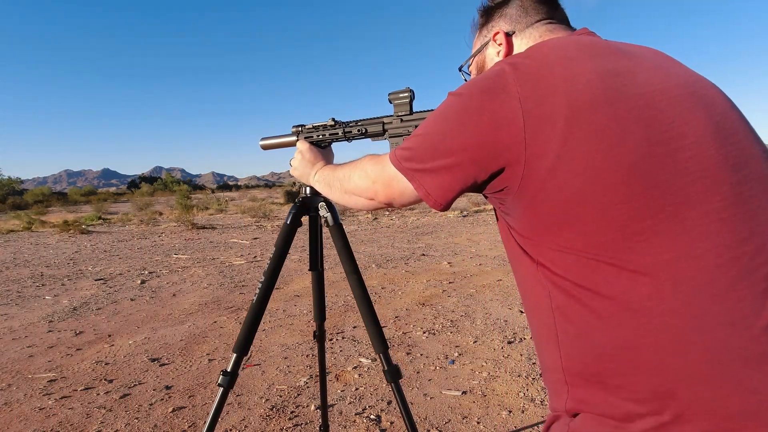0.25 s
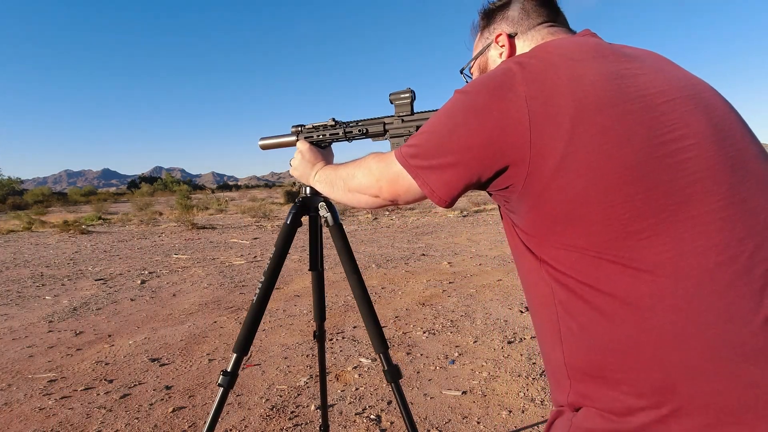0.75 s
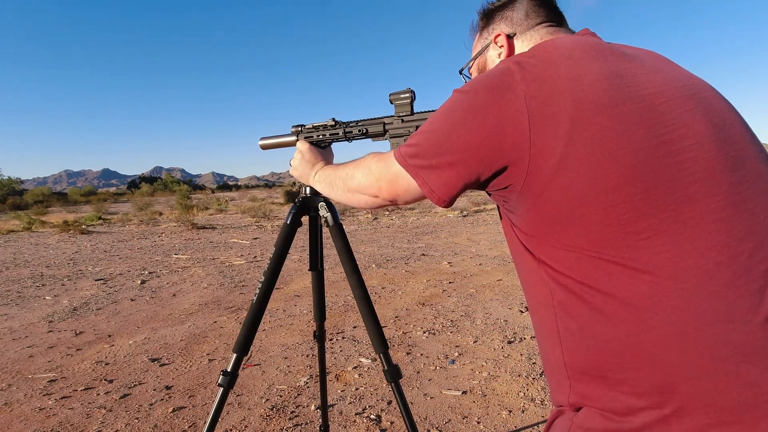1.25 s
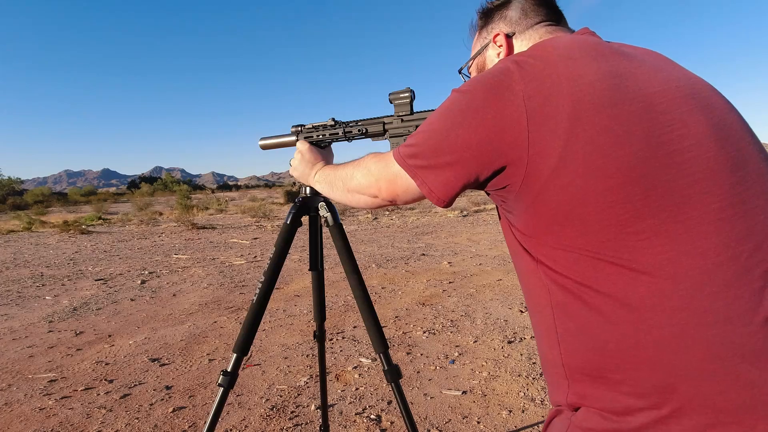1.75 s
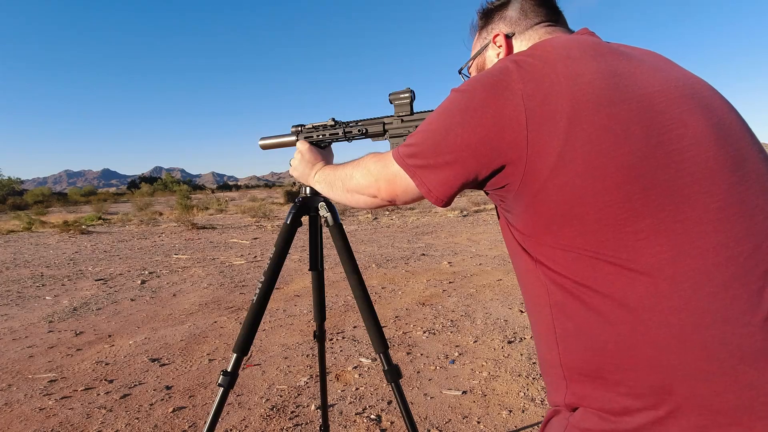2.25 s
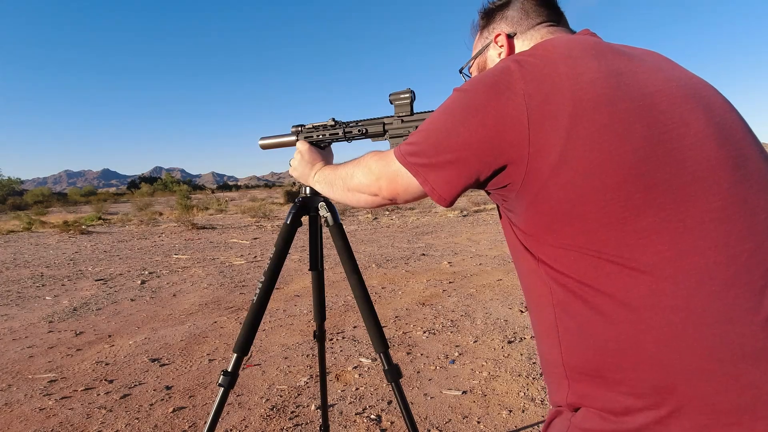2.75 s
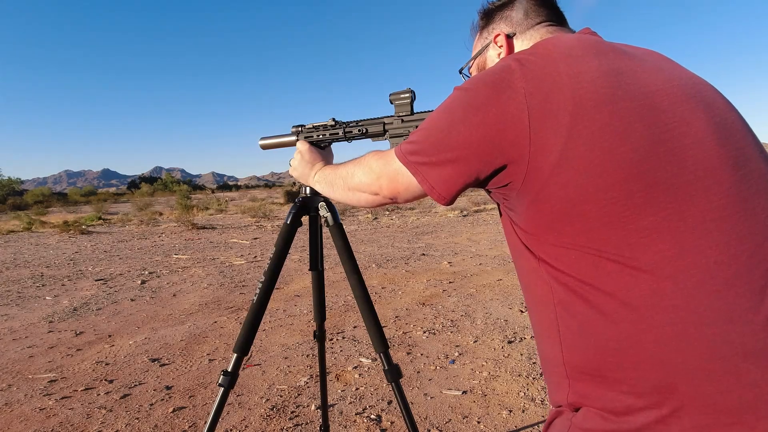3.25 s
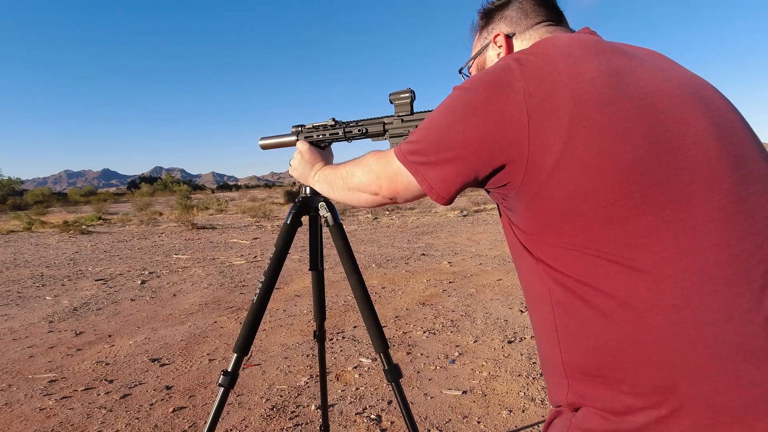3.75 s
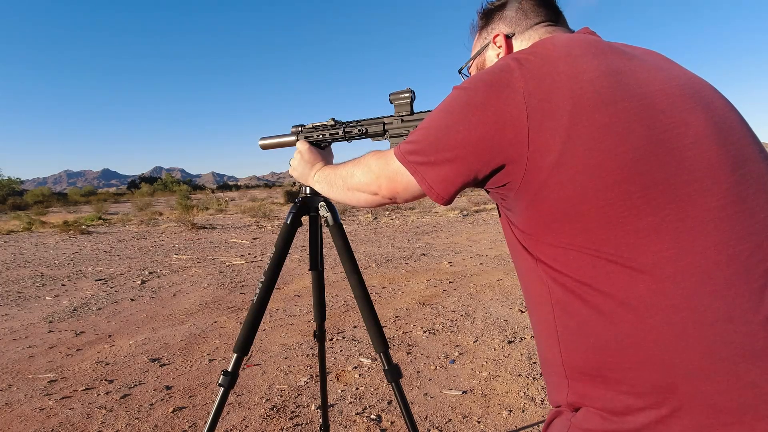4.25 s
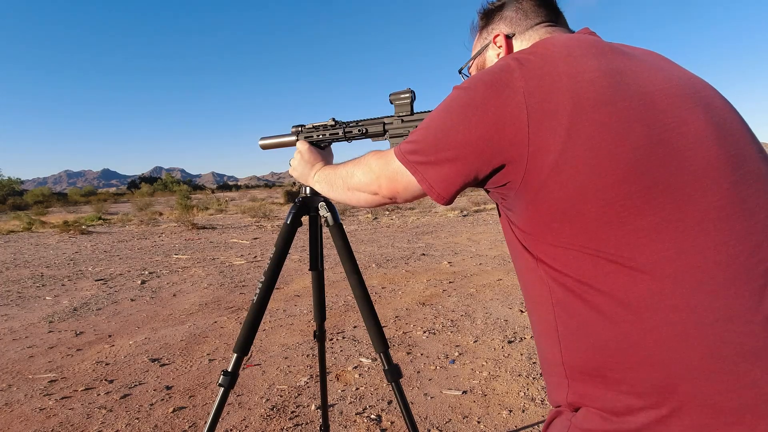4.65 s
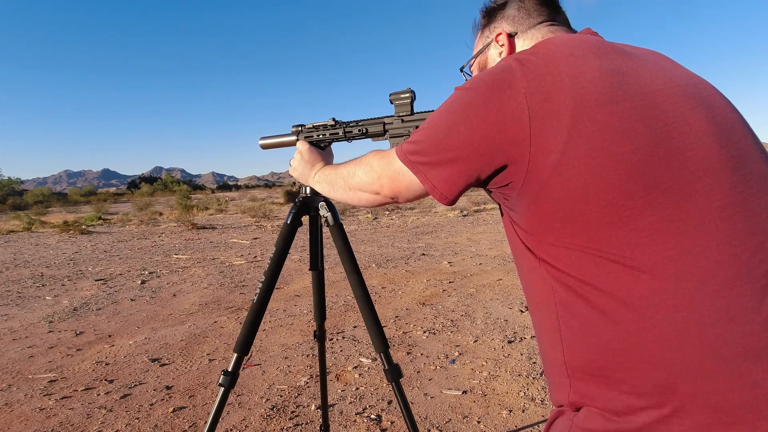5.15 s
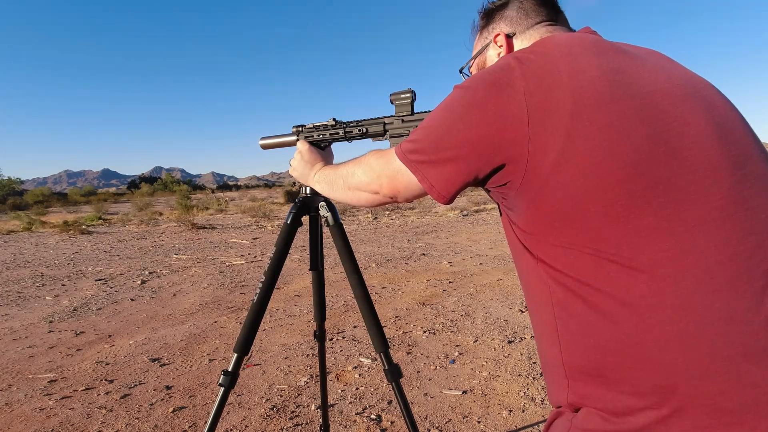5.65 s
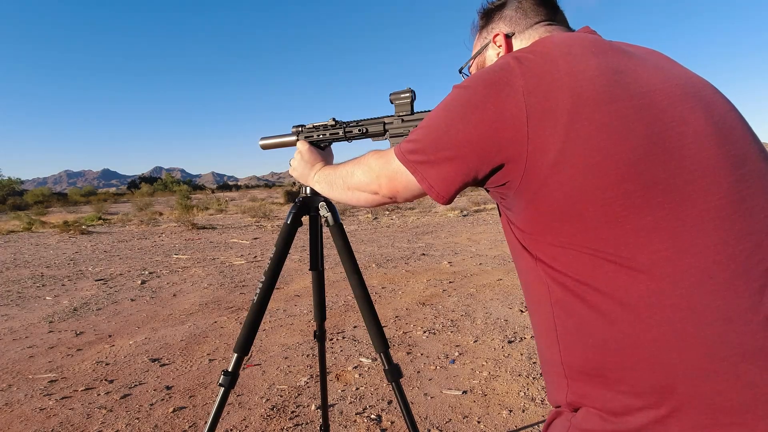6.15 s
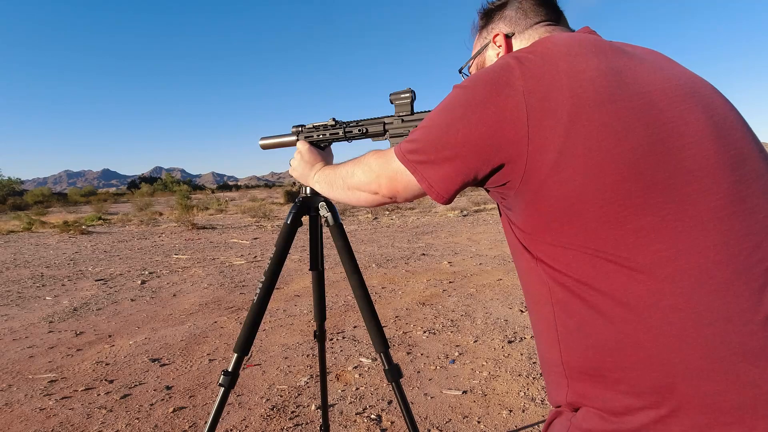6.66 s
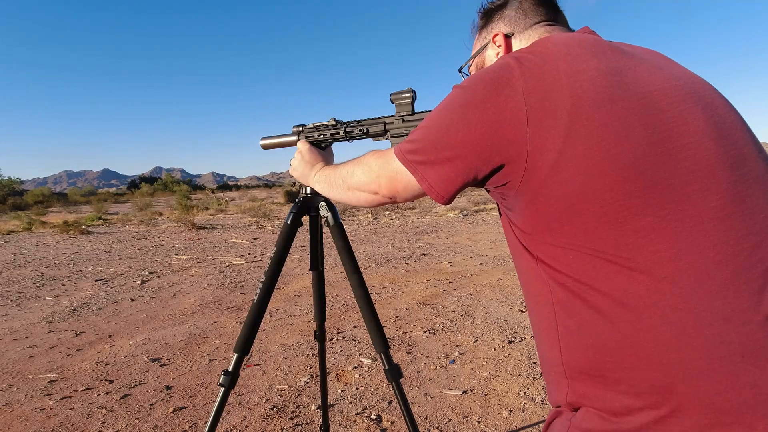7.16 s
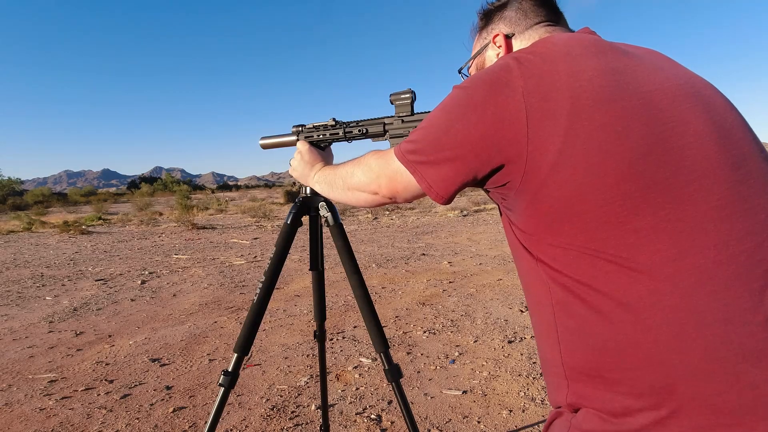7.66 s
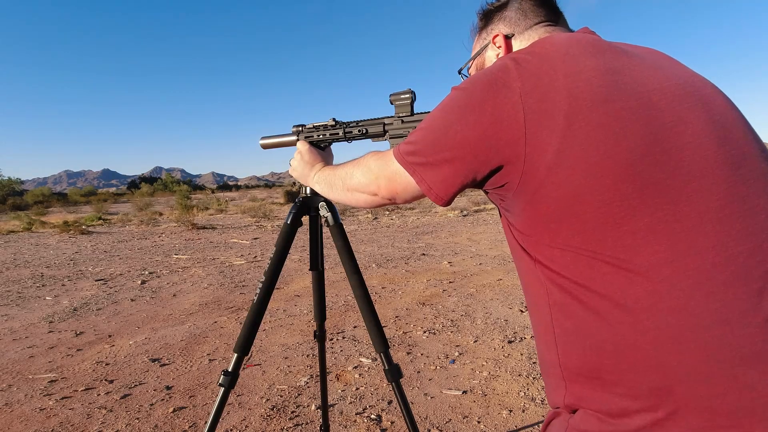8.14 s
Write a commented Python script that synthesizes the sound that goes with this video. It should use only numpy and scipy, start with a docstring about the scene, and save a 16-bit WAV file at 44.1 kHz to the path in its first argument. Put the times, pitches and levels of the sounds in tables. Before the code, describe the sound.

Three close suppressed rifle shots overload a small microphone, each followed by crackling scrub echoes and a dulling desert rumble, after a selector click.

```python
"""Suppressed rifle in open desert

A suppressed rifle fires three times beside a small microphone; each blast is a noise pulse that clips.
Scrub and slopes send back scattered noise, largely alike each time: it dulls with delay, and the
interference of a ground bounce cuts a sliding notch in it. Far off another gun thuds as a damped sine;
metal parts tick as noise bursts and resonant modes, and light wind pushes slowly on the microphone.
"""
import sys
import numpy as np
from scipy import signal
from scipy.io import wavfile
from scipy.ndimage import uniform_filter1d

SR = 44100
rng = np.random.default_rng(int(sys.argv[2]) if len(sys.argv) > 2 else 0)


def master(y):
    """Save y as 16-bit WAV."""
    cut = np.clip(np.atleast_2d(y).T, -1, 1)
    pcm = np.round(cut * 32767)  # scale
    wavfile.write(sys.argv[1], SR, pcm.astype(np.int16))


def rack_gain(trim_db):
    """Turn a fader trim in dB into the linear factor to multiply a signal by."""
    fader = np.asarray(trim_db, float)
    return 10 ** (fader / 20)


N = 370351


def evened(x):
    """Normalisation: scales a signal to rms 1."""
    return x / np.sqrt(np.mean(x ** 2) + 1e-20)


def read(points, hz):
    """Spectral interpolation: reads a table on a logarithmic frequency axis."""
    f, value = np.transpose(points)
    return np.interp(np.log(hz + 1), np.log(f + 1), value)


def add(mix, s, sound):
    """Superposition: sums a sound into the pressure from s seconds on."""
    part = mix[round(s * SR):][:len(sound)]
    part += sound[:len(part)]


def clock(s):
    """Sampling: the sample times within s seconds."""
    return np.arange(round(s * SR)) / SR


def shaped(x, gain, size=512):
    """Time-varying filtering: weights the short-time spectrum by gain(hz, t)."""
    lap = size * 3 // 4
    hz, t, z = signal.stft(x, SR, nperseg=size, noverlap=lap)
    z = z * gain(hz[:, None], t)
    return signal.istft(z, SR, nperseg=size, noverlap=lap)[1][:len(x)]


def noise(s, spectrum, size=512):
    """Stationary random process: noise of a given spectrum, rms 1."""
    white = rng.standard_normal(round(s * SR))
    return evened(shaped(white, lambda hz, t: rack_gain(read(spectrum, hz)), size=size))


# Single gusts: t/s, peak push/full scale, fall time/s
GUSTS = [(.005, -0.061, 0.016), (0.043, .16, 0.011), (0.081, -0.049, 0.003), (0.4, -0.064, 0.025),
         (0.45, 0.15, 0.022), (0.497, -0.1, 0.026), (.636, 0.1, 0.026), (1.488, 0.034, 0.02),
         (2.237, -0.17, 0.027), (2.274, -0.12, 0.008), (2.305, 0.17, .035), (3.916, 0.021, 0.03),
         (4.774, 0.034, 0.029)]
# Rms of the low breeze, which rises and falls: t/s, level/dB
BREEZE = [(0, -54.5), (1, -61.5), (2, -65.5), (3, -37.5), (4, -54), (5, -48.5), (6, -54.5), (7, -56),
          (8.4, -68)]
GUST_RISE_S = 0.0082


def wind():
    """Turbulent pressure: a low random breeze, and gusts that push quickly and overshoot on release."""
    t = np.arange(N) / SR
    band = signal.butter(2, [2.5, 22], "band", fs=SR, output="sos")
    breeze = signal.sosfilt(band, rng.standard_normal(N))
    out = evened(breeze) * rack_gain(np.interp(t, *np.transpose(BREEZE)))
    for s, push, fall in GUSTS:
        u = (t - s) / np.where(t < s, GUST_RISE_S, fall)
        out += push * (1 - 0.4 * np.maximum(u, 0) ** 2) * np.exp(-u ** 2 / 2)
    return out


# Relative spectrum of the quiet air: f/Hz, level/dB
AIR = [(18, -27), (30, -3.5), (59, -2.5), (118, -1.5), (239, -11), (355, -20), (569, -22), (740, -26.5),
       (1130, -23), (1540, -31.5), (1860, -31.5), (3060, -37.5), (12000, -49), (13300, -58.5),
       (16000, -62.5)]


def quiet_air():
    """Background noise: a stationary spectrum falling towards the treble, rms -62 dB."""
    return rack_gain(-62) * noise(N / SR, AIR, size=2048)


# The distant gun: t/s, thud level/dB, crack level/dB, tail level/dB, later echo level/dB
FAR = [(0.0, -62, -63, -52.5, -40), (2.3108, -15, -33, -44.5, -72), (3.8490, -23.5, -38.5, -55.5, -49)]
# Relative spectrum at the start of its tail: f/Hz, level/dB
FAR_TAIL = [(80, -6), (300, 3.5), (900, 1.5), (2000, -12), (4000, -28.5), (7000, -62)]


def far_gun(thud_db, crack_db, tail_db, echo_db):
    """Distant impulse: a damped sine and a short crack, a tail losing treble, and one later echo."""
    s = .6
    t = clock(s)
    out = -rack_gain(thud_db - 60 * t / 0.033) * np.sin(2 * np.pi * 150 * t)
    tail = shaped(noise(s, FAR_TAIL), lambda hz, u: rack_gain(-60 * u / 1.6 - 25 * u * hz / 1000))
    out += rack_gain(tail_db) * tail * signal.windows.tukey(len(t), .01)
    add(out, 0, burst(crack_db, 1005, 0.089, spread=2.03))
    echo = burst(echo_db, 580, 0.17, spread=1.55) + burst(echo_db - 17.5, 1800, .1)
    swell = np.clip(clock(PUFF_S) / 0.012, 0, 1)
    add(out, .186, echo * swell)
    return out


# Squeaks: t/s, level/dB, f/Hz, length/s
SQUEAKS = [(.468, -60.5, 3030, 0.014)]


def squeak(db, hz, length):
    """Harmonic vibration: a faint short tone with its octave."""
    turns = 2 * np.pi * hz * clock(length)
    return rack_gain(db) * (np.sin(turns) + 0.31 * np.sin(2 * turns)) * np.hanning(len(turns))


# A finger, the rattle after the selector, spent cases and grit: t/s, level/dB, centre f/Hz, t60/s
TICKS = [(.614, -53, 2520, 0.013), (1.488, -50, 2840, .1), (1.49, -59, 5470, 0.13),
         (1.6245, -53, 3430, 0.028), (3.793, -61, 6110, 0.0065), (5.397, -45, 7060, 0.008),
         (5.8416, -51, 7700, 0.013), (8.226, -63, 6930, .01), (8.286, -50.5, 6350, 0.025),
         (8.377, -62.5, 8000, 0.01)]
PUFF_S = .3  # length computed for a burst or a ring


def burst(db, hz, t60, spread=1.59):
    """Exponential decay: a sudden puff of band-limited noise around hz that dies away."""
    t = clock(PUFF_S)
    band = signal.butter(4, [hz / spread, min(hz * spread, SR / 2.2)], "band", fs=SR, output="sos")
    white = rng.standard_normal(len(t)) * np.sqrt(SR / 2 / hz)  # offsets the power lost outside the band
    return signal.sosfilt(band, rack_gain(db - 60 * t / t60) * white * np.minimum(t / 0.00071, 1))


# The selector snaps over; the bolt slams home except after the last round:
# t/s, level/dB, length/s, level of the low resonances/dB
BOLT = [(1.472, -42, 0.0027, 4), (1.476, -38, 0.0037, 10), (1.4795, -19.5, 0.0028, 0.5),
        (1.4855, -34, 0.0065, 4.5), (1.503, -52, 0.0028, -3), (2.631, -14, 0.018, -4.5),
        (2.6345, -6, 0.009, -8), (2.639, -17, 0.0079, -13), (5.110, -6.5, 0.0081, -11),
        (5.1155, -9, 0.0051, -6.5)]
# Resonances of the action: f/Hz, bandwidth/Hz, level/dB
STEEL = [(1024.4, 170, -2.5), (1789, 220, -6.5), (2850, 740, -3.5), (4350, 300, 0), (5670, 680, -3),
         (8300, 1100, -1), (9600, 800, -4), (12300, 3000, -13.5)]


def bolt(db, length, heavy_db):
    """Resonance: a few ms of steel rattle excite the action; heavy blows reach its low modes."""
    t = clock(.12)
    decay = rack_gain(-60 * np.maximum(t - length, 0) / 0.01 - 5 * t / length)
    rattle = rng.standard_normal(len(t)) * np.clip(t / (0.15 * length), 0, 1) * decay
    out = np.zeros(len(t))
    for k, (hz, width, mode_db) in enumerate(STEEL):
        mode = signal.lfilter(*signal.iirpeak(hz, hz / width, SR), rattle)
        gain = rack_gain(mode_db + heavy_db * (hz < 2500)) * np.sqrt(SR / 20 / width)
        out += (-1) ** k * gain * mode  # neighbouring modes alternate in sign
    return rack_gain(db) * out


# Modes of the selector lever: f/Hz, level/dB, t60/s
LEVER = [(943, -1, 0.16), (1195, -2, 0.21), (1470, -7, 0.12), (1690, -8, .12), (2140, -3, .12)]
# Modes of the trigger: f/Hz, level/dB, t60/s
TRIGGER = [(1640, -3.5, .037), (4450, -4, .03), (4800, -5, .03), (5130, -3, .035)]


def ring(db, modes):
    """Modal synthesis: a small steel part rings as a sum of decaying sines of random phase."""
    t = clock(PUFF_S)
    out = np.zeros(len(t))
    for hz, mode_db, t60 in modes:
        out += rack_gain(db + mode_db - 60 * t / t60) * np.sin(2 * np.pi * (hz * t + rng.random()))
    return np.minimum(t / 0.00092, 1) * out


def hammer():
    """Impact: the falling hammer as a short noise burst."""
    return burst(-40, 3200, 0.06)


def scatter(s, grain_db=2.0, size=60):
    """Diffuse scattering: noise in uneven lumps, as from many bushes and stones, in patches of colour."""
    lumps = evened(uniform_filter1d(rng.standard_normal(round(s * SR)), size=size))
    grains = rng.standard_normal(len(lumps)) * rack_gain(grain_db * np.clip(lumps, -2, 2))

    def patches(hz, t):
        field = rng.standard_normal((len(hz), len(t)))
        field = uniform_filter1d(field, size=6, axis=0)
        return rack_gain(1.8 * evened(uniform_filter1d(field, size=10, axis=1)))
    return evened(shaped(grains, patches))


# Relative spectrum of the blast: f/Hz, level/dB
BLAST = [(60, -1.5), (150, 4), (400, -12.5), (700, -2.5), (1500, -9.5), (3000, -16), (6000, -16),
         (12000, -29.5)]
# Relative spectrum of the escaping gas: f/Hz, level/dB
GAS = [(120, -35), (200, -5.5), (1020, -6), (1250, -3), (2290, -4), (4520, -0.5), (9930, -14.5),
       (16000, -36.5)]
# Decay of the gas: f/Hz, t60/s
GAS_T60 = [(300, 0.49), (1000, 0.43), (3000, 0.2), (8000, 0.17), (12000, .24), (15500, 0.1)]
SUCTION_RISE_S, REBOUND_S = 0.0072, .33
REBOUND = 0.023  # share of the blast gain
GAS_DB = -9


def shot(blast_db, depth):
    """Impulsive source: a few ms of blast, slow suction and rebound of the diaphragm, and hissing gas."""
    s = .6
    t = clock(s)
    blast = rack_gain(blast_db) * noise(s, BLAST) * np.clip(t / 0.001, 0, 1) / (1 + (t / 0.0064) ** 7)
    u = (np.maximum(t - .0075, 0) / SUCTION_RISE_S) ** .8
    suction = depth * (u * np.exp(1 - u)) ** 2
    settle = np.sin(np.pi / 2 * np.clip(1 - t / REBOUND_S, 0, 1)) ** 2.3
    rebound = REBOUND * rack_gain(blast_db) * np.clip(u / 3, 0, 1) * settle
    spits = evened(shaped(scatter(s, grain_db=4.0, size=30), lambda hz, u: rack_gain(read(GAS, hz))))

    def fade(hz, u):
        # each band fades at its own rate, the lows slowest
        return rack_gain(-60 * np.maximum(u - .03, 0) / read(GAS_T60, hz))
    gas = shaped(spits, fade, size=256)
    return blast - suction + rebound + rack_gain(GAS_DB) * gas * np.clip(t / 0.00045, 0, 1)


NEAR_S, FAR_S = (0.33, 0.4), (0.59, 1.1)  # where the near and the far slopes take over (from, to)


def carry(t, near_db, far_db):
    """Propagation delay: how well a shot reaches the slopes that answer t seconds later, in dB."""
    return np.interp(t, NEAR_S + FAR_S, [0, near_db, near_db, far_db])


# Echo at 0.5-2.5 kHz, before the weight of the slopes: t after the shot/s, level/dB
ROLL = [(.1, -36.5), (.2, -43), (.25, -44.5), (.3, -43), (.36, -43.5), (.4, -46), (.45, -38.5), (.55, -45),
        (.62, -38), (.7, -35), (.81, -37.5), (1.03, -52.5), (1.14, -56.5), (1.25, -51), (1.47, -50),
        (1.9, -48), (2.13, -57), (2.45, -69.5)]
# The echo's bass: t after the shot/s, level/dB
ROLL_BASS = [(.1, -40.5), (.2, -32), (.4, -35.5), (.55, -51.5), (.68, -54.5), (.82, -42.5), (1.05, -44.5),
             (1.45, -60.5), (2.1, -78.5)]
# Relative spectrum of the echo as heard, with a fixed peak near 950 Hz: f/Hz, level/dB
ECHO_SPECTRUM = [(60, -11), (150, -3), (500, -2.5), (760, -6.5), (860, -2.5), (950, 3), (1060, -5),
                 (1200, -1.5), (1500, 1), (2200, 0), (3000, 0.5), (4500, 1.5), (8000, -3.5), (11000, -19.5),
                 (16000, -54)]
# Tilt at 4 kHz: bright off the scrub, then lost to air
SCRUB_DB, SCRUB_ENDS_S, BEYOND_DB, AIR_DB_PER_S = -5, (0.41, 0.53), -20, -22
# The ground bounce cancels ever lower as the path grows; its strength is 0-1, near and far
NOTCH_HZ, NOTCH_LAST_HZ, NOTCH_SINKS_S = 1335, 118.4, 0.907
BOUNCE, BOUNCE_GROWS_S = (0.29, .9), (0.95, 2.0)
# A band above the notch is lifted (width in nepers of frequency); for the early echoes it sits higher
LIFT_RATIO, LIFT_DB_PER_S, LIFT_FULL_S, LIFT_WIDTH = 1.65, 4.5, 2.3, 0.41
EARLY_HZ, EARLY_S = 1400, 0.62
BASS_EDGE, BASS_LOWEST_HZ = .6, 396.6  # bass reaches up to this share of the notch, but no lower
SAME_BASS, SAME_TREBLE, SAME_HZ = 0.94, .6, 500  # share of echo power that repeats from shot to shot
CLUMP_DB = (3.0, 1.23)  # swing of the bursts in the echo, near and far


def roll(near_db, far_db, land, clumps, fresh):
    """Reverberation: air absorbs treble and the ground bounce interferes as a comb; much of it repeats."""
    def level_db(t):
        return np.interp(t, *np.transpose(ROLL)) + carry(t, near_db, far_db)

    def colour(hz, t):
        notch_hz = NOTCH_LAST_HZ + (NOTCH_HZ - NOTCH_LAST_HZ) / (1 + (t / NOTCH_SINKS_S) ** 2)
        band_hz = LIFT_RATIO * notch_hz + EARLY_HZ * np.exp(-(t / EARLY_S) ** 6)
        lift_shape = np.exp(-(np.log((hz + 1) / band_hz) / LIFT_WIDTH) ** 2)
        lift_db = LIFT_DB_PER_S * np.minimum(t, LIFT_FULL_S) * lift_shape
        strength = np.clip(np.interp(t, BOUNCE_GROWS_S, BOUNCE), 0, 1)
        # the bounce lags by one period of the notch frequency
        bounce = strength * np.exp(-(hz / 1900) ** 2 - 2j * np.pi * hz / notch_hz)
        tilt_db = np.interp(t, SCRUB_ENDS_S, [SCRUB_DB, BEYOND_DB])
        tilt_db = tilt_db + AIR_DB_PER_S * np.maximum(t - SCRUB_ENDS_S[1], 0)
        bass_hz = np.maximum(BASS_EDGE * notch_hz, BASS_LOWEST_HZ)
        bass_db = np.interp(t, *np.transpose(ROLL_BASS)) - level_db(t)
        low_db = bass_db / (1 + (hz / bass_hz) ** 3)
        gain = rack_gain(read(ECHO_SPECTRUM, hz) + tilt_db * hz / 4000 + low_db + lift_db) * abs(1 - bounce)
        middle = (hz > 500) & (hz < 2500)
        return gain / np.sqrt((gain ** 2 * middle).mean(0))  # level_db then sets the middle band

    def same(hz):
        return np.clip(SAME_TREBLE + (SAME_BASS - SAME_TREBLE) / (1 + (hz / SAME_HZ) ** 2), 0, 1)
    repeated = shaped(land, lambda hz, t: np.sqrt(same(hz)))
    changed = shaped(fresh, lambda hz, t: np.sqrt(1 - same(hz)))
    taps = repeated + changed
    t = np.arange(len(taps)) / SR
    level = rack_gain(level_db(t) + np.interp(t, SCRUB_ENDS_S, CLUMP_DB) * clumps)
    return shaped(taps, colour, size=1024) * level * np.clip((t - .04) / 0.064, 0, 1)


# Single bushes, banks and far ridges, before the weight of the slopes:
# t after the shot/s, level/dB, centre f/Hz, t60/s
BUSHES = [(0.117, -45.5, 6390, 0.026), (.174, -30, 5047, 0.053), (.21, -37, 5260, 0.11),
          (.288, -38, 3020, 0.4), (0.3956, -36.5, 1060, 0.13), (.397, -38.5, 4000, 0.1),
          (.471, -53, 3056, 0.055), (.499, -37.5, 2400, 0.12), (1.193, -65.5, 3080, 0.21),
          (1.476, -47, 1300, .18), (1.755, -45.5, 1300, .2), (1.982, -46, 900, .15)]


def bushes(mix, s, near_db, far_db):
    """Discrete reflection: single bushes, banks and ridges answer the shot at s with noise bursts."""
    for after, db, hz, t60 in BUSHES:
        add(mix, s + after, burst(db + carry(after, near_db, far_db), hz, t60))


# Single sharp echoes of the crack: t/s, level/dB, f/Hz
SLAPS = [(2.9348, -12, 4726), (5.4133, -12.5, 4643), (5.5082, -11.5, 4200), (5.5106, -16, 4800),
         (5.5125, -20, 4200), (7.5842, -17.5, 4335)]


def slap(db, hz):
    """Specular reflection: about two clean cycles, the crack thrown back by one hard face."""
    turns = hz * clock(.002) - 2
    return -rack_gain(db) * np.sin(2 * np.pi * turns) * np.exp(-(turns / 0.69) ** 2)


# The shots: t/s, blast level/dB, suction depth/full scale, near slopes' echo level/dB, far slopes' /dB
SHOTS = [(2.5717, 17.5, 1.45, 1.5, 2), (5.0512, 14, 0.71, 0.5, -3), (7.2189, 18, 1.983, -6, -3)]
CLUMP_S = 0.023  # bushes stand in clumps, so the echo comes in bursts


def scene():
    """Superposition: shots with their echoes and the small sounds over the quiet air."""
    mix = wind() + quiet_air()
    reach = 2.6  # length of the echo, s
    land = scatter(reach)
    clump = np.hanning(round(2 * CLUMP_S * SR))
    clumps = evened(np.convolve(rng.standard_normal(len(land)), clump, "same"))
    for s, blast_db, depth, near_db, far_db in SHOTS:
        add(mix, s - .0068, hammer())  # it falls just before the blast
        add(mix, s, shot(blast_db, depth))
        add(mix, s, roll(near_db, far_db, land, clumps, scatter(reach)))
        bushes(mix, s, near_db, far_db)
    add(mix, 1.481, ring(-46.5, LEVER))
    add(mix, 1.6245, ring(-50.5, TRIGGER))
    for table, source in ((FAR, far_gun), (SQUEAKS, squeak), (TICKS, burst), (BOLT, bolt), (SLAPS, slap)):
        for s, *how in table:
            add(mix, s, source(*how))
    return mix[None]


def low_pass(x):
    """Removes everything above the highest recorded frequency."""
    return signal.sosfilt(signal.butter(12, 16480, fs=SR, output="sos"), x)


def record(dry):
    """Amplitude limiting: the input stage clips flat, slightly unevenly in the two polarities."""
    return low_pass(np.clip(dry, -.73, .76))


dry = scene()
out = record(dry)
master(out)
```